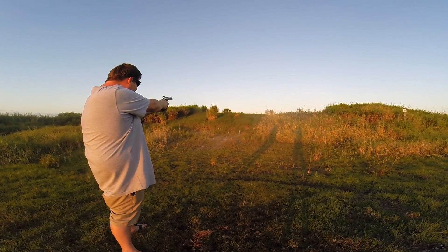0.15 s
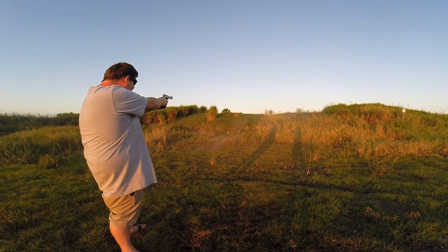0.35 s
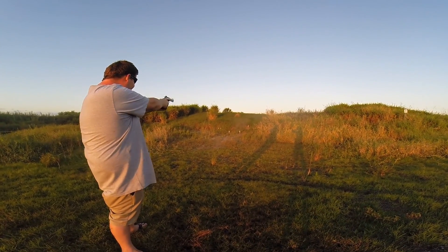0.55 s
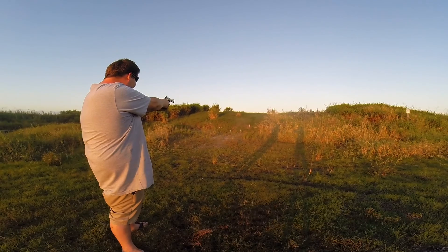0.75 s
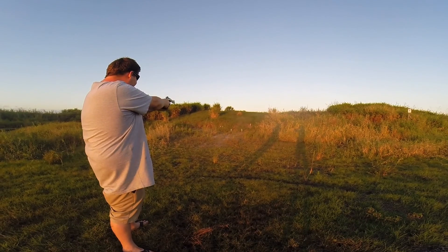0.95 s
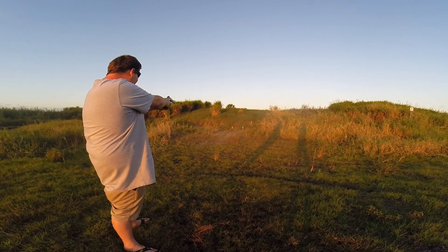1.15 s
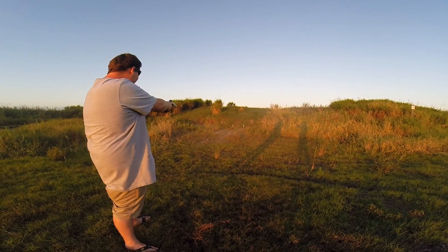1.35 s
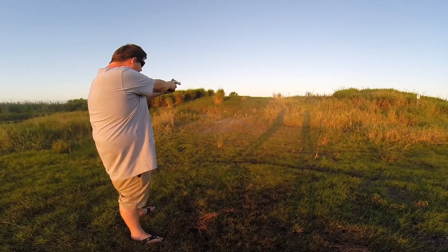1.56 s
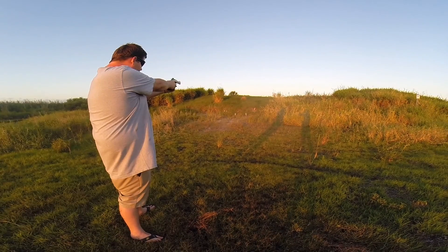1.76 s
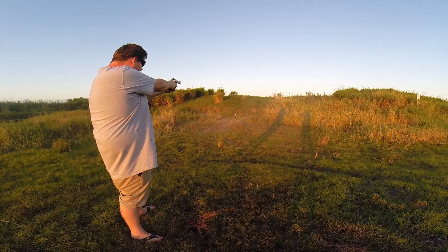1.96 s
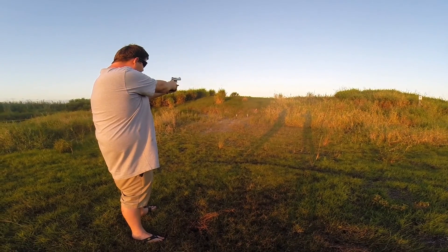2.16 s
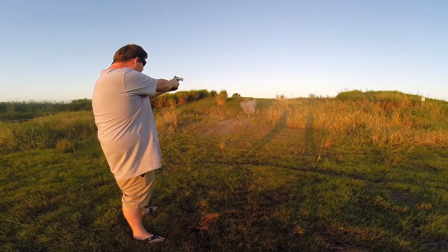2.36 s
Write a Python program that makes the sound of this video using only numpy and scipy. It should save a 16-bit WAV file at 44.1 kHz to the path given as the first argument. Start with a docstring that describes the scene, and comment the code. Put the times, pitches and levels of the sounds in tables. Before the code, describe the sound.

A pistol fires close to the microphone in an open field, and the bang rolls away across the ground. Faint far birds chirp over light wind, then a second loud shot cracks and echoes.

```python
"""Two handgun shots on an open grass range, close enough to overload the microphone.
Trigger and striker click, the muzzle blast cracks and booms, and the bullet thuds into the earth bank.
The report scatters back from ground and brush and rolls away as decaying noise.
Light wind, insects and a few far birds lie behind; wind and insects dip after each shot."""
import sys
import numpy as np
from scipy import signal
from scipy.fft import rfft, irfft
from scipy.io import wavfile

SR = 44100
rng = np.random.default_rng(int(sys.argv[2]) if len(sys.argv) > 2 else 0)


def unload_audio(sound):
    """Save the sound as a 16-bit wav file, at the path given as the first command line argument."""
    columns = np.transpose(np.atleast_2d(sound))
    # keep every value between -1 and 1, then stretch to whole-number steps
    steps = np.round(np.clip(columns, -1, 1) * 32767)
    wavfile.write(sys.argv[1], SR, steps.astype(np.int16))


N = 110250
T = np.arange(N) / SR
BIN_HZ = np.arange(N // 2 + 1) * SR / N

# Shots: (time [s], crack [dB], boom [dB], boom delay [s], hollow ring [dB], hollow delay [s],
# housing ring [dB], ping [Hz], ping [dB], echo [dB])
SHOTS = [(0.2152, -4.5, -5, .0005, -6.5, 0.0014, 3.5, 3088, -8, 0.5),
         (2.2044, -4.5, 0, 0.00257, 9.5, 0.002914, -4, 4670, -4, -1.5)]


def from_db(db):
    """Decibels to gain."""
    return 10 ** (np.asarray(db) / 20)


def at_hz(table, hz, column=1):
    """Table column interpolated over log frequency."""
    table = np.array(table)
    return np.interp(np.log(hz + 1e-9), np.log(table[:, 0]), table[:, column])


def shaped(gain):
    """Unit-rms noise with spectrum gain(Hz), empty below 18 Hz."""
    x = irfft(rfft(rng.standard_normal(N)) * gain(BIN_HZ) * (BIN_HZ > 18), N)
    return x / x.std()


def noise(spectrum):
    """Unit-rms noise with a tabled spectrum."""
    return shaped(lambda hz: from_db(at_hz(spectrum, hz)))


def narrow(centre_hz, rel_width):
    """Wavering tone: noise through a narrow resonance."""
    return shaped(lambda hz: 1 / (1 + ((hz / centre_hz - 1) / rel_width) ** 2))


def envelope(start_s, attack_s, hold_s, t60_s, times=T):
    """Linear rise, hold, exponential fall."""
    age_s = times - start_s
    decay = np.log(1000) * np.maximum(age_s - attack_s - hold_s, 0) / t60_s
    return np.clip(age_s / attack_s, 0, 1) * np.exp(-np.minimum(decay, 50))


def swell(start_s, length_s):
    """Half-sine arch."""
    return np.sin(np.pi * np.clip((T - start_s) / length_s, 0, 1))


def tone(start_s, hz, hold_s, t60_s):
    """Resonance, driven briefly, then ringing out."""
    return np.sin(2 * np.pi * hz * (T - start_s)) * envelope(start_s, .0002, hold_s, t60_s)


def wind_and_insects():
    """Open air, one soft gust and a thin insect band; all dip after each shot."""
    # Noise spectra: (frequency [Hz], density [dB])
    air_spectrum = [(25, -4), (45, -6.5), (72, 3.5), (110, -7), (220, -12), (450, -17), (800, -21),
                    (1300, -25.5), (2200, -26.5), (3400, -28), (5500, -34.5), (10500, -41.5),
                    (12500, -45.5), (15000, -49)]
    gust_spectrum = [(20, -2), (33, -1), (70, -12), (150, -17), (400, -41.5), (2000, -72)]
    # Insect loudness: (time [s], level [dB])
    insect_levels = [(0, -77), (1.0, -80.5), (1.45, -83.5), (1.6, -76.5), (1.95, -76), (2.5, -76.5)]
    gust_s, gust_width_s = 2, .13
    dip_db, hold_s, recover_s = -7, .36, .56
    air = from_db(-54) * noise(air_spectrum)
    gust = from_db(-48.5) * noise(gust_spectrum) / (1 + ((T - gust_s) / gust_width_s) ** 2)
    insects = from_db(np.interp(T, *np.transpose(insect_levels))) * narrow(9000, rel_width=.018)
    dip = sum(np.interp(T - s, [0, hold_s, hold_s + recover_s], [1, 1, 0], left=0) for s, *_ in SHOTS)
    return (air + gust + insects) * from_db(dip_db * dip)


def action_clicks():
    """Steel trigger and striker: each click is one ringing pitch in a bright rasp."""
    # Clicks: (time [s], level [dB], pitch [Hz])
    clicks = [(0.1833, -36, 3440), (0.207, -37, 3200), (2.174, -32, 3410), (2.1962, -33, 2900)]
    # Rasp spectrum: (frequency [Hz], density [dB])
    rasp_spectrum = [(1200, -27.5), (2400, -3.5), (4500, -1.5), (6000, -8.5), (7600, -2), (10500, -6.5),
                     (15000, -16.5)]
    rasp = from_db(-3.5) * noise(rasp_spectrum)
    out = 0
    for s, db, hz in clicks:
        ring = np.sin(2 * np.pi * hz * (T - s))
        out += from_db(db) * envelope(s, .0002, hold_s=.0023, t60_s=.0037) * (ring + rasp)
    return out


def blast_wave(start_s, length_s):
    """Pressure jump sinking through zero into a longer suction."""
    u = np.maximum(T - start_s, 0) / length_s * 2
    return (u > 0) * (1 - u) * np.exp(-np.minimum(u, 50))


def muzzle_blast():
    """Shock front, crackling gas, boom, ring of the microphone housing and bounce off the ground."""
    # Gas crack spectrum: (frequency [Hz], density [dB])
    crack = [(100, -8), (350, 4), (680, 0.5), (950, 2.5), (1600, 3), (2600, 5.5), (4000, -6.5),
             (5500, -11.5), (7800, -5.5), (11000, -16), (16000, -25.5)]
    boom_hz, hollow_hz = 222, 500
    housing_hz, upper_mode_hz, housing_lag_s = 1108.5, 2399, .002
    bark_hz, bounce_lag_s = 1529, .004
    out = 0
    for s, crack_db, boom_db, boom_lag_s, hollow_db, hollow_lag_s, ring_db, ping_hz, ping_db, _ in SHOTS:
        out += from_db(3.5) * blast_wave(s, length_s=.00077)
        out += from_db(crack_db) * noise(crack) * envelope(s, .00017, hold_s=.003, t60_s=.013)
        out += from_db(boom_db) * tone(s + boom_lag_s, boom_hz, hold_s=.0036, t60_s=.005)
        out += from_db(hollow_db) * tone(s + hollow_lag_s, hollow_hz, hold_s=.0005, t60_s=.01)
        for hz, db in (housing_hz, ring_db), (upper_mode_hz, -8):
            out += from_db(db) * tone(s + housing_lag_s, hz, hold_s=.0036, t60_s=.003)
        for hz, db in (bark_hz, 3.5), (ping_hz, ping_db):
            out += from_db(db) * tone(s + bounce_lag_s, hz, hold_s=.0017, t60_s=.003)
    blast_low_cut = signal.butter(1, 66, "high", fs=SR, output="sos")
    return signal.sosfilt(blast_low_cut, out)


def echoes():
    """Each path scatters the report into noise that decays at its own rate per band."""
    # Return spectra: (frequency [Hz], density [dB], t60 [s])
    near_ground = [(60, -10.5, .04), (220, -10, .04), (436, 5.5, 0.032), (750, -4, .04), (1200, 0.5, 0.037),
                   (1900, -11.5, .035), (3180, -8.5, 0.028), (5030, -17, .04), (7960, -17, .04),
                   (15000, -30, .04)]
    grass = [(60, -13.5, .5), (220, 1, 1), (415, 2, 0.16), (700, -3, 0.84), (1200, -3, 1), (1840, -9, 1),
             (3300, -6, 0.79), (5100, -13, 0.42), (9000, -17, 0.41), (15000, -29, 0.2)]
    bank = [(100, -20, 0.092), (230, 8, .15), (380, 10, 0.082), (700, -13, 0.084), (1200, 0.5, .12),
            (1900, -26, .12), (3300, -13, .15), (4600, -29, .1), (9000, -34, .1)]
    brush = [(70, -16.5, .5), (248.5, 2.5, 0.48), (434, -7, 0.29), (810, -11.5, 0.13), (976, -9, 0.13),
             (1226, 6, 0.18), (1505, 0, 0.32), (1800, -8.5, 0.2), (2490, -2.5, 0.46), (3150, -10.5, 0.37),
             (5630, -12, 0.22), (8800, -18, 0.17), (15000, -36, .15)]
    far_field = [(66.4, -8, 6.4), (186, 2.5, 4.6), (417, -21.5, 4.3), (756, -9.5, 3.1), (1265, 3, 2.18),
                 (1870, -8.5, 1.8), (3200, -17, 2), (6300, -24, 0.78), (14200, -45, 0.55)]
    ridge = [(70, -8, .1), (160, 17, 0.088), (400, -21, 0.091), (754, -22, .1), (1100, 13, 0.092),
             (2000, -27, .1), (6000, -30, .1)]
    late_hiss = [(200, 3.5, 0.37), (600, 5.5, 1), (2080, 0.5, 3.2), (4500, -4, 2.9), (8100, -10, 2.8),
                 (14000, -22.5, 2.2)]
    # (spectrum, delay [s], attack [s], hold [s], level [dB])
    paths = [(near_ground, .0065, .0018, .001, -21),
             (grass, .008, .004, .064, -38.5),
             (bank, .055, .008, .0036, -33.5),
             (brush, .18, .041, .043, -34.5),
             (far_field, .19, .073, .092, -43.5),
             (ridge, .87, .027, .01, -43.5),
             (late_hiss, .68, .0881, .02, -60.5)]
    scatter_db, scatter_hz = 1.5, 110  # single reflections stand out of the wash
    edges_hz, grid_s = np.geomspace(35, 17000, 45), T[::22]
    centres_hz = np.sqrt(edges_hz[1:] * edges_hz[:-1])
    lumps = from_db(scatter_db * shaped(lambda hz: 1 / (1 + (hz / scatter_hz) ** 2)))
    wash = rfft(rng.standard_normal(N) * lumps / np.sqrt(np.mean(lumps ** 2)))
    power = 0  # band x time
    for spectrum, delay_s, attack_s, hold_s, db in paths:
        density = from_db(at_hz(spectrum, centres_hz)) ** 2
        density *= from_db(db) ** 2 * SR / 2 / np.sum(density * np.diff(edges_hz))
        t60_s = at_hz(spectrum, centres_hz, column=2)[:, None]
        for s, *_, echo_db in SHOTS:
            gain = from_db(echo_db) * envelope(s + delay_s, attack_s, hold_s, t60_s, grid_s)
            power += density[:, None] * gain ** 2
    out = 0
    for band_power, low_hz, high_hz in zip(power, edges_hz, edges_hz[1:]):
        band = irfft(wash * (BIN_HZ >= low_hz) * (BIN_HZ < high_hz), N)
        out += np.interp(T, grid_s, np.sqrt(band_power)) * band
    return out


def bullet_thuds():
    """One dull pressure pulse per bullet striking the earth bank."""
    delay_s, thud_hz = .0645, 400
    out = 0
    for s, *_ in SHOTS:
        u = np.minimum((np.pi * thud_hz * (T - s - delay_s)) ** 2, 50)
        out += (1 - 2 * u) * np.exp(-u)
    return from_db(-17.5) * out


def birds():
    """A few far chips and one falling, buzzy trill."""
    # Chips: (time [s], length [s], pitch [Hz], level [dB], noisiness [0-1])
    calls = [(1.315, 0.11, 3730, -64, 0.9), (1.41, 0.09, 3600, -68, 0.6), (1.513, 0.036, 2696, -48.5, 0.35),
             (1.698, 0.029, 3590, -59, 0), (1.951, .03, 3550, -57, .1)]
    # Rasp spectrum: (frequency [Hz], density [dB])
    rasp_spectrum = [(1000, -29), (2200, 0.5), (3600, 0), (4800, -2), (7000, -23)]
    rasp = noise(rasp_spectrum)
    chips = 0
    for s, length_s, hz, db, noisiness in calls:
        voice = narrow(hz, rel_width=.024) + noisiness * rasp
        chips += from_db(db) * swell(s, length_s) ** 2 * voice
    trill_s, trill_length_s, warble_hz, swing_hz = 1.812, .128, 76, 244
    warble = np.sin(2 * np.pi * warble_hz * (T - trill_s))
    pitch_hz = np.interp(T, [trill_s, trill_s + trill_length_s], [3120, 2650]) + swing_hz * warble
    whistle = np.sin(2 * np.pi * np.cumsum(pitch_hz) / SR)
    trill = swell(trill_s, trill_length_s) * (1 - .5 * warble) * whistle
    return chips + from_db(-54) * trill


def scene():
    """All sources at one microphone."""
    return (muzzle_blast() + action_clicks() + bullet_thuds() + echoes() + birds()
            + wind_and_insects())[None]


def record(dry):
    """Overload flattens the blast peaks; a steep low-pass cuts the top."""
    ceiling, cutoff_hz = .98, 15300
    clipped = dry / (1 + (dry / ceiling) ** 8) ** (1 / 8)
    low_pass = 1 / (1 + (BIN_HZ / cutoff_hz) ** 90)
    return irfft(rfft(clipped) * low_pass, N)


dry = scene()
out = record(dry)
unload_audio(out)
```